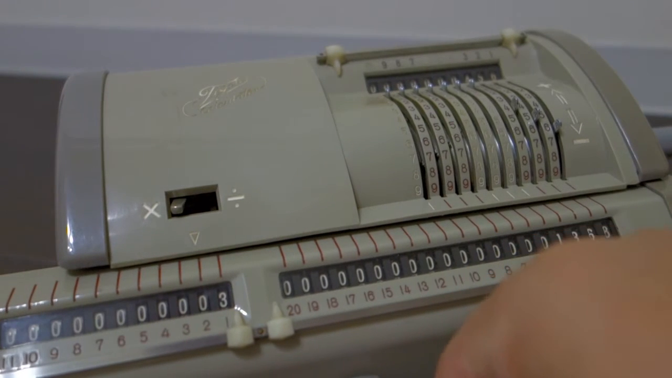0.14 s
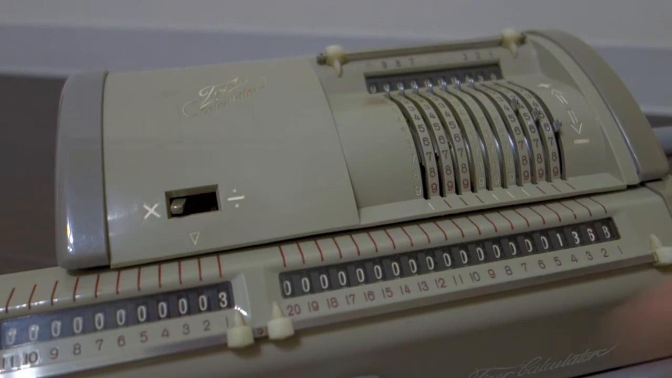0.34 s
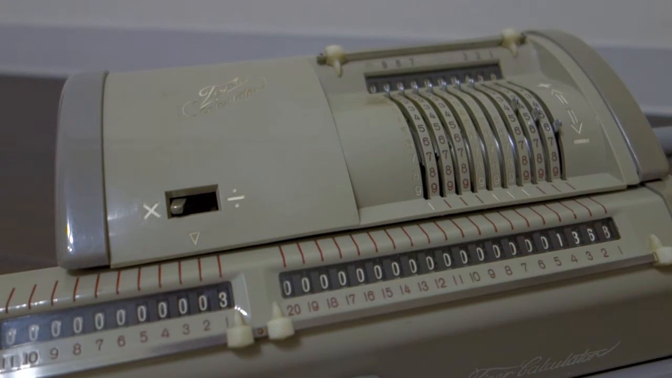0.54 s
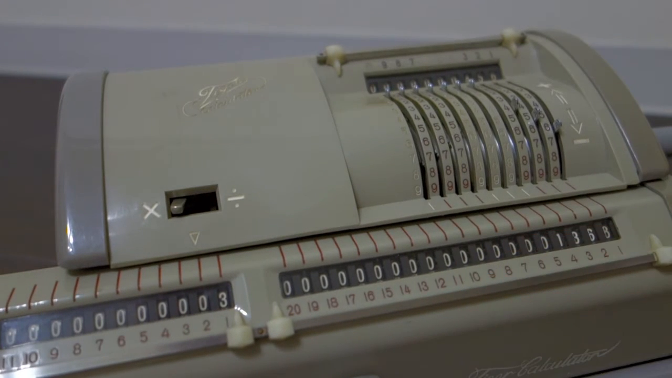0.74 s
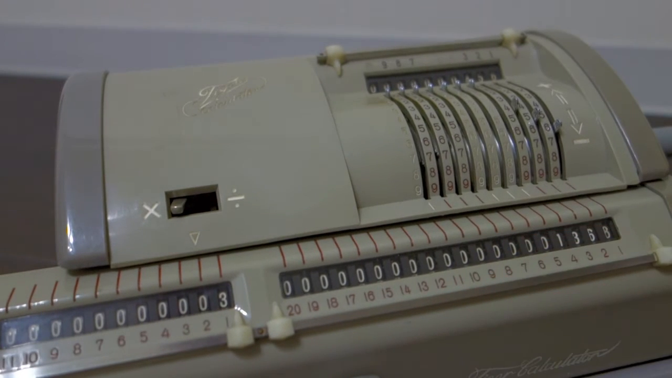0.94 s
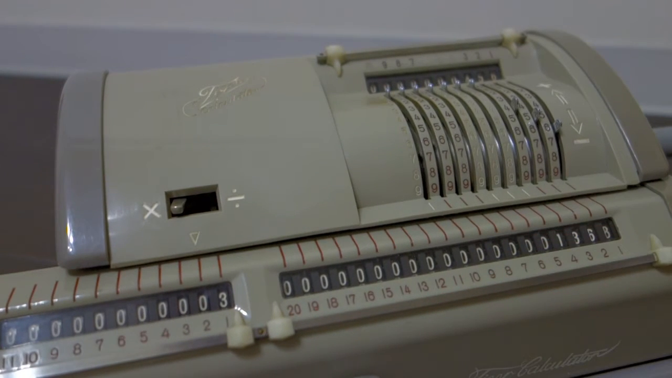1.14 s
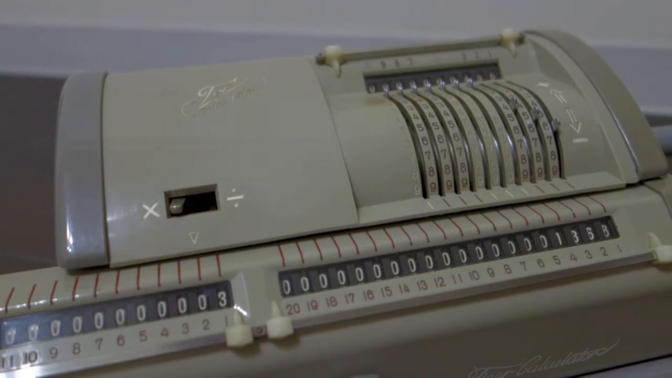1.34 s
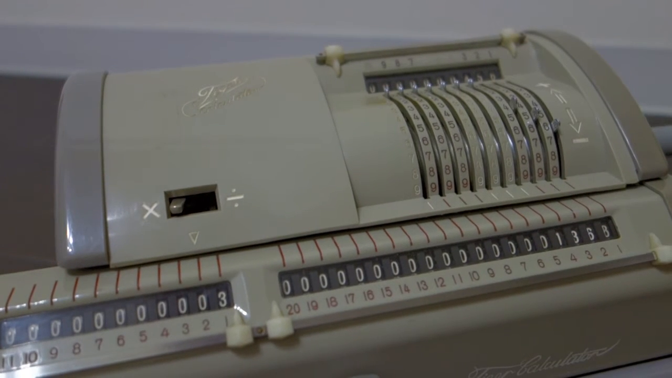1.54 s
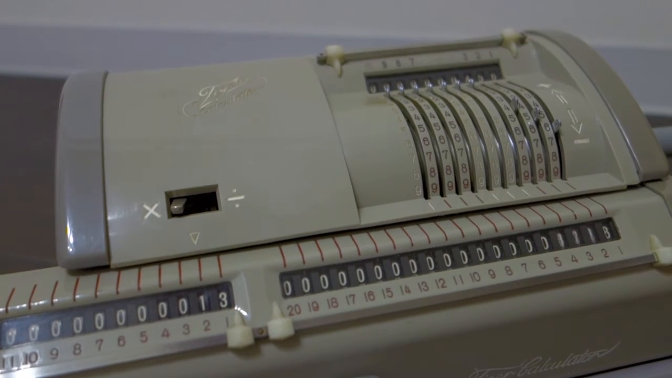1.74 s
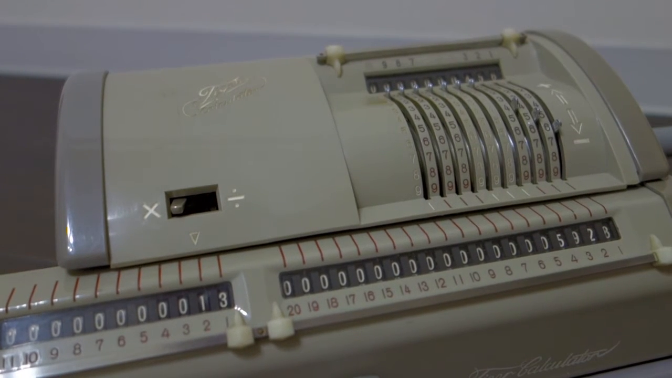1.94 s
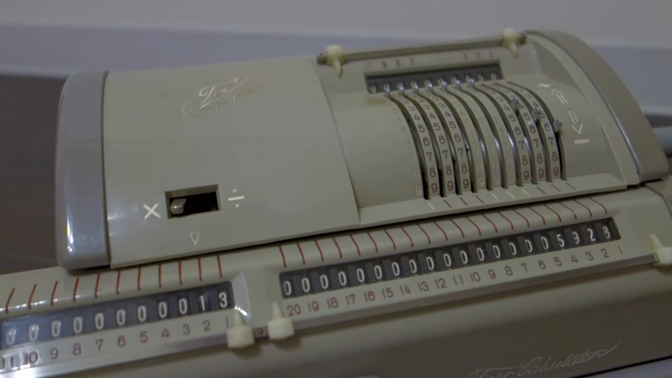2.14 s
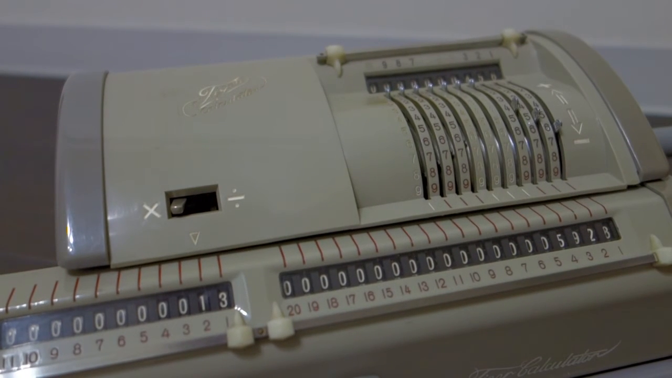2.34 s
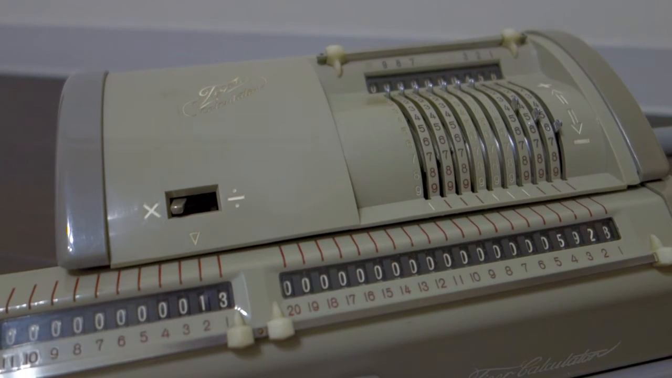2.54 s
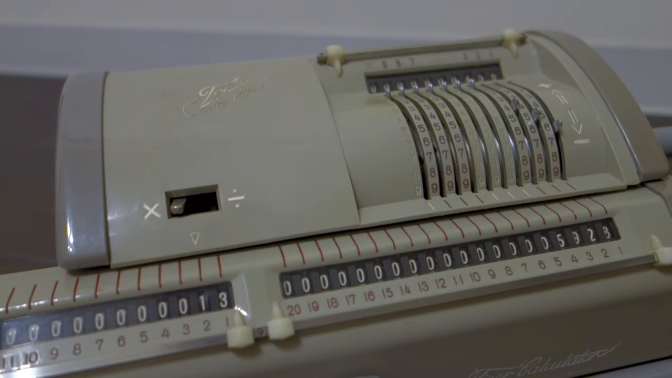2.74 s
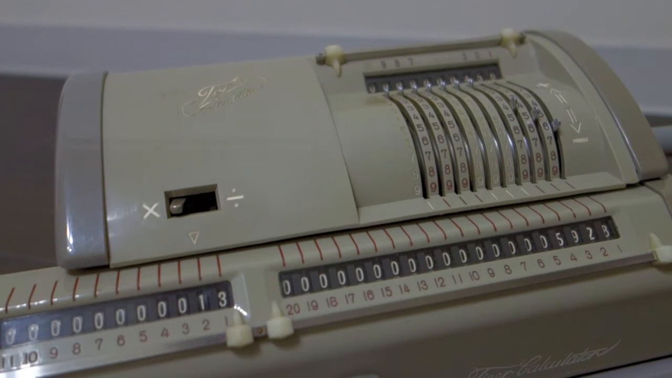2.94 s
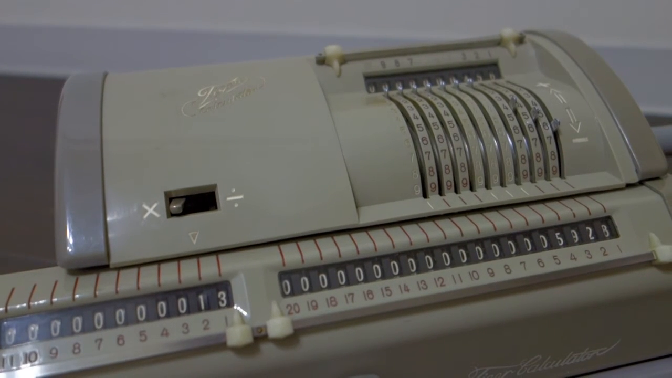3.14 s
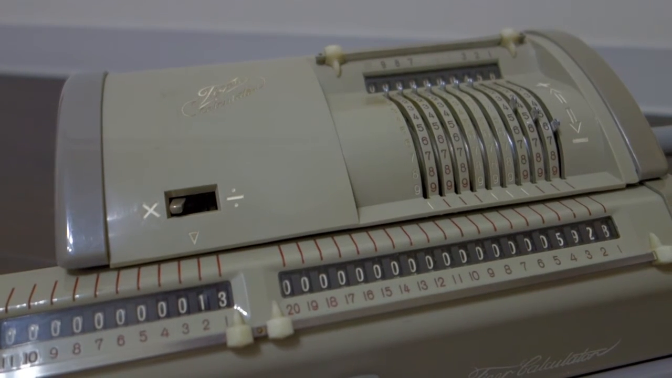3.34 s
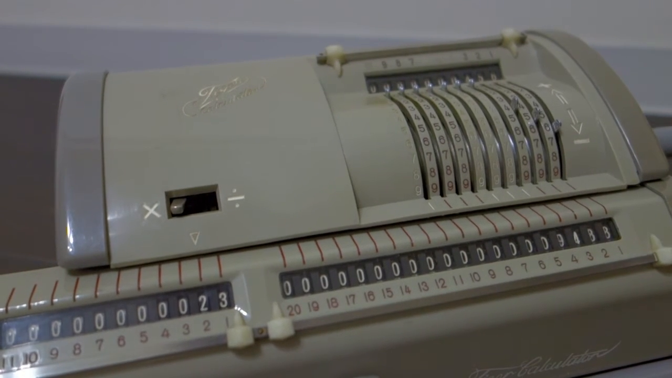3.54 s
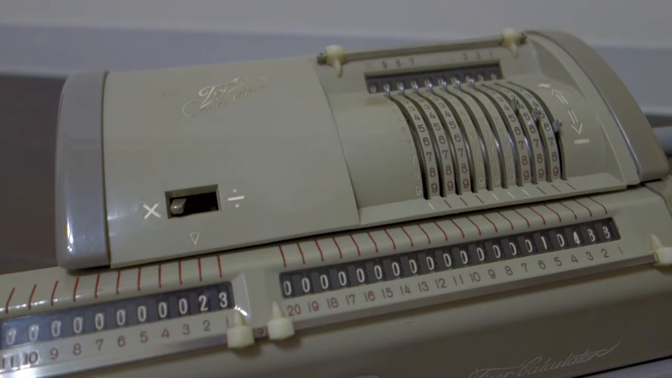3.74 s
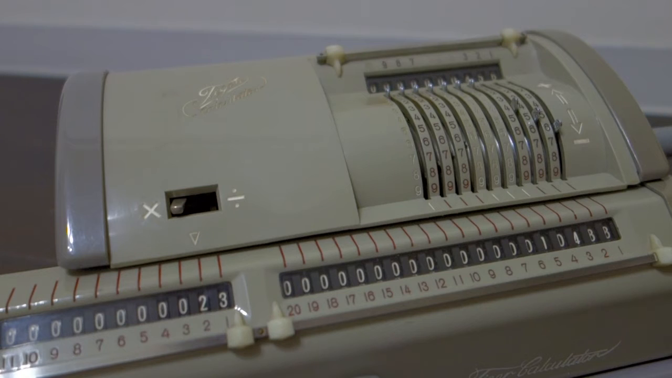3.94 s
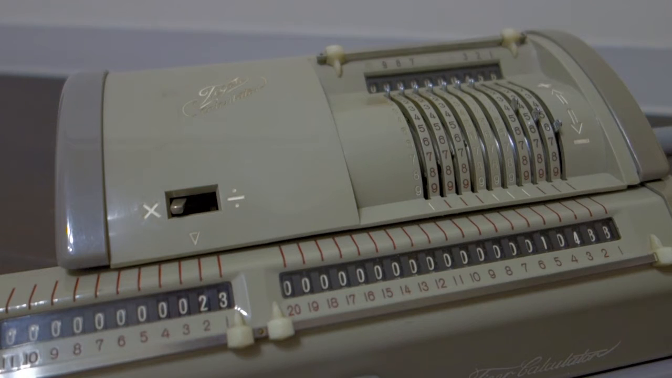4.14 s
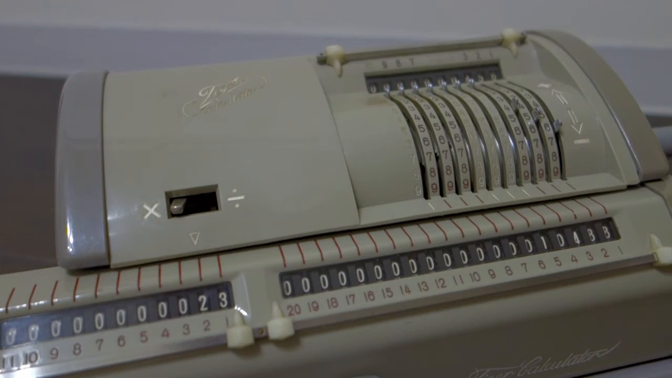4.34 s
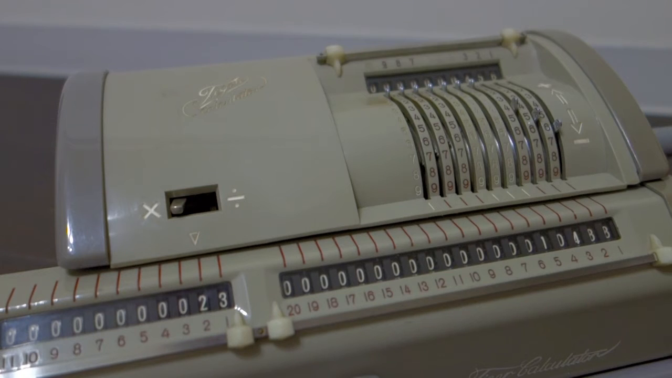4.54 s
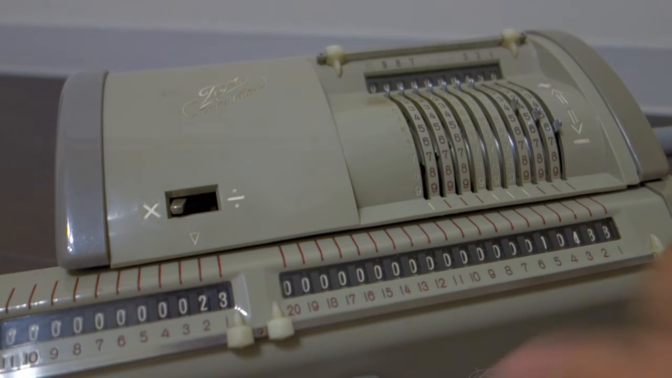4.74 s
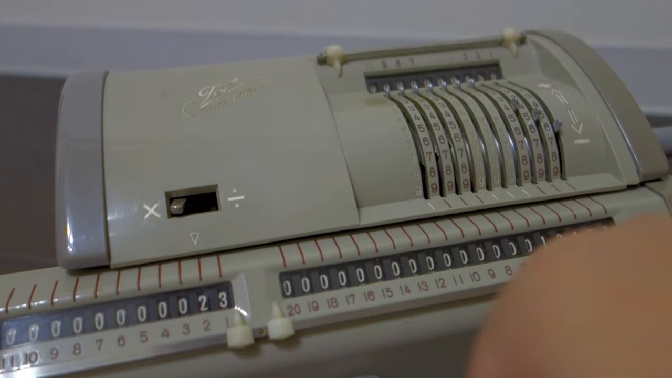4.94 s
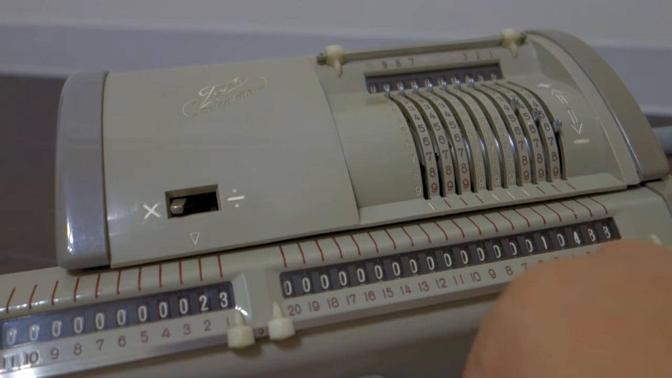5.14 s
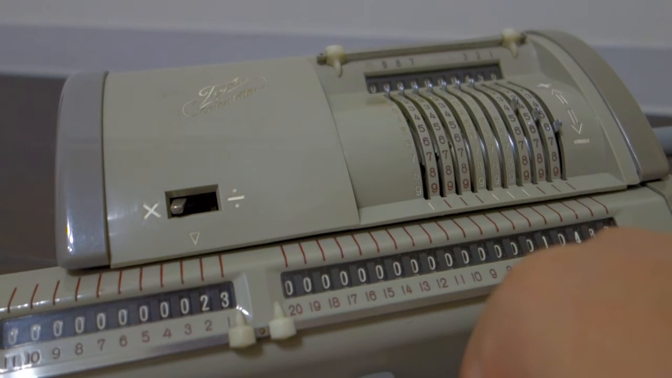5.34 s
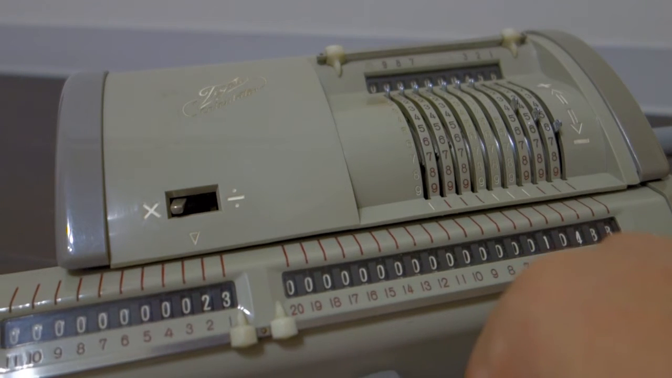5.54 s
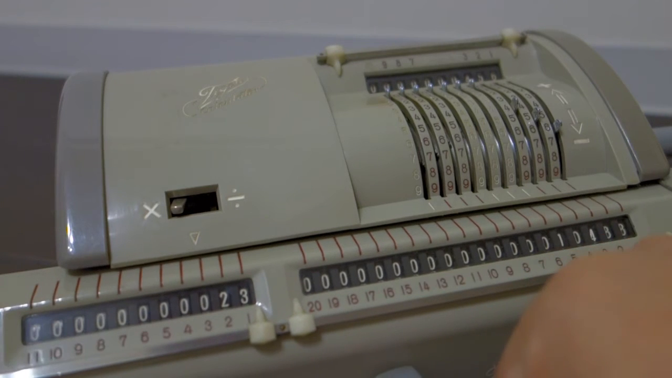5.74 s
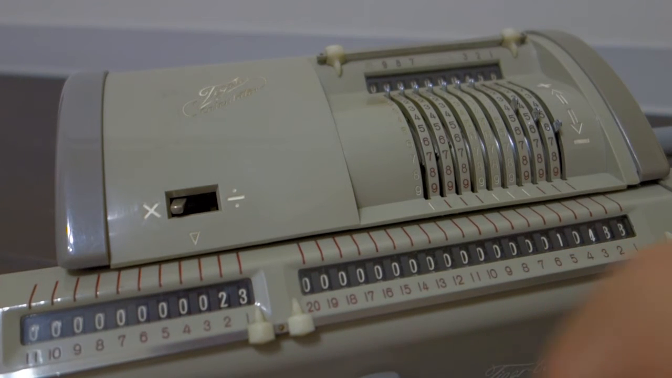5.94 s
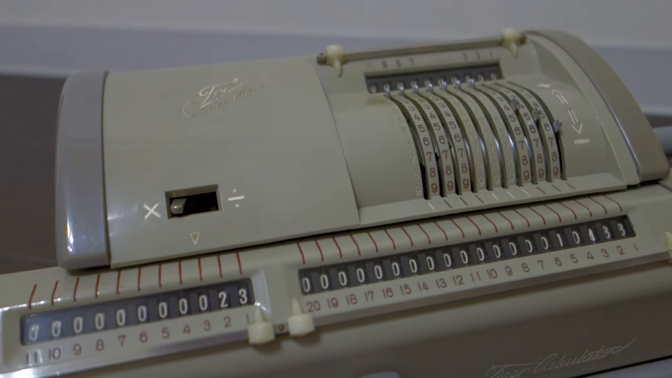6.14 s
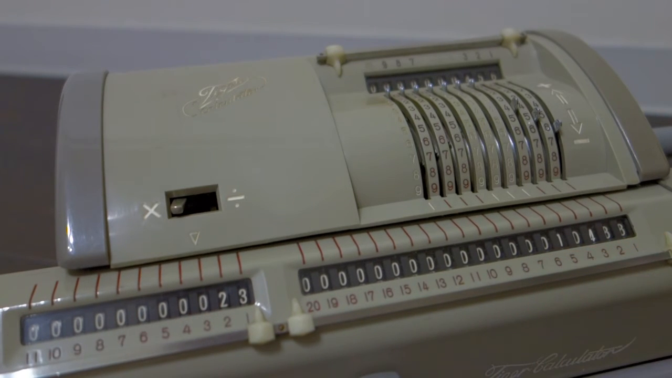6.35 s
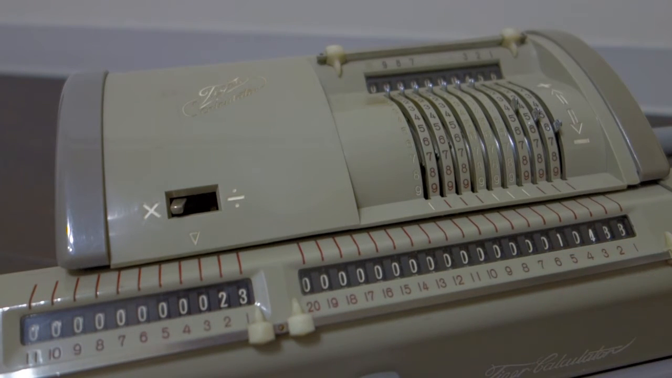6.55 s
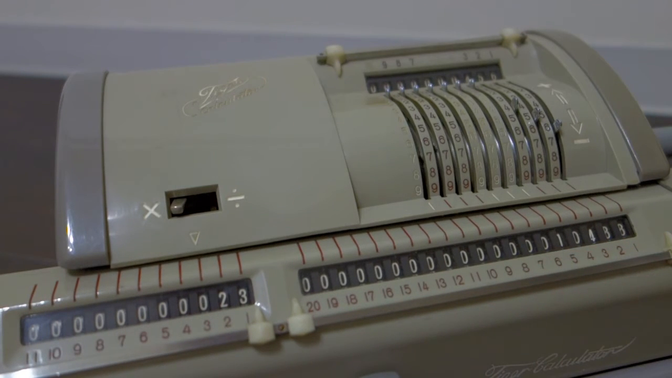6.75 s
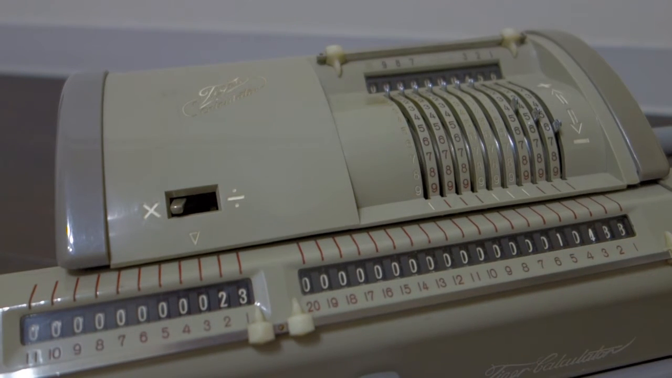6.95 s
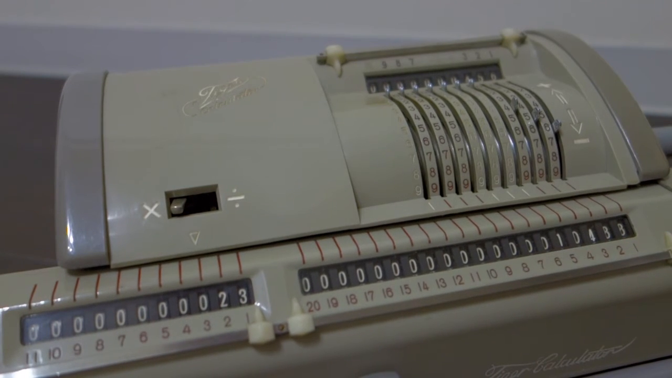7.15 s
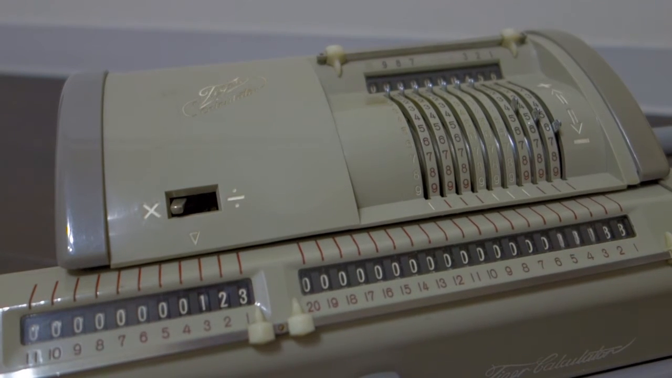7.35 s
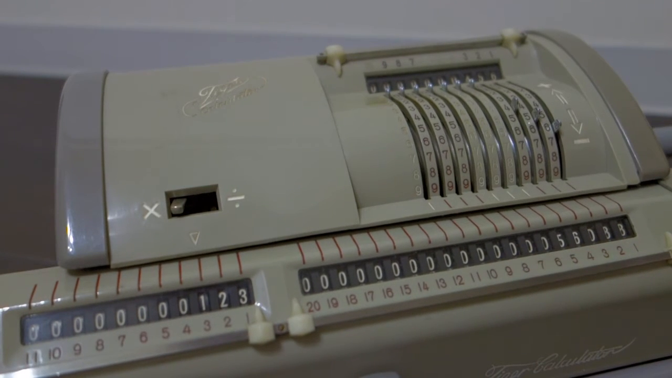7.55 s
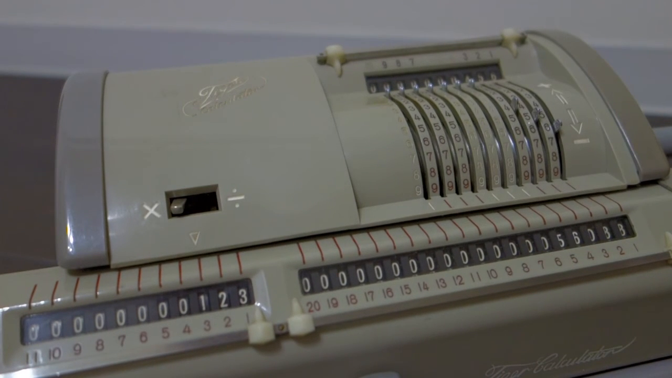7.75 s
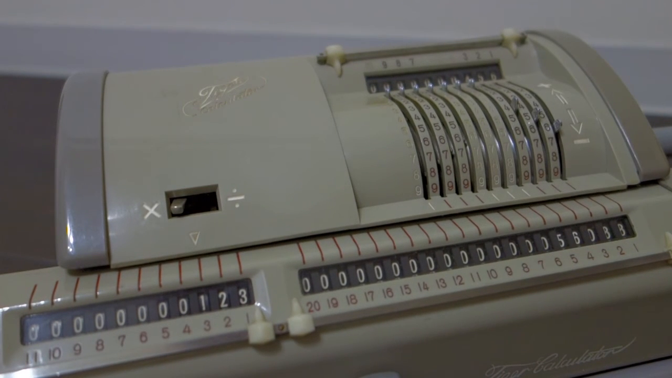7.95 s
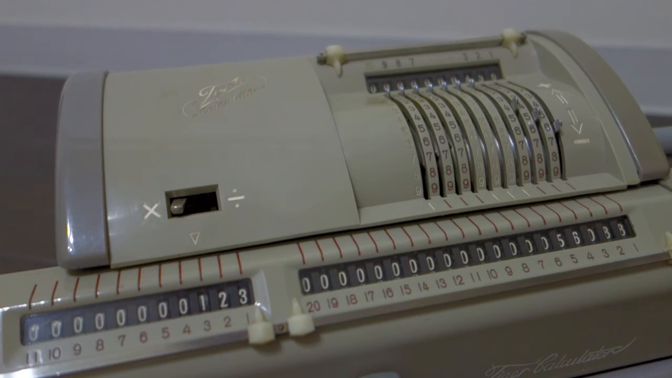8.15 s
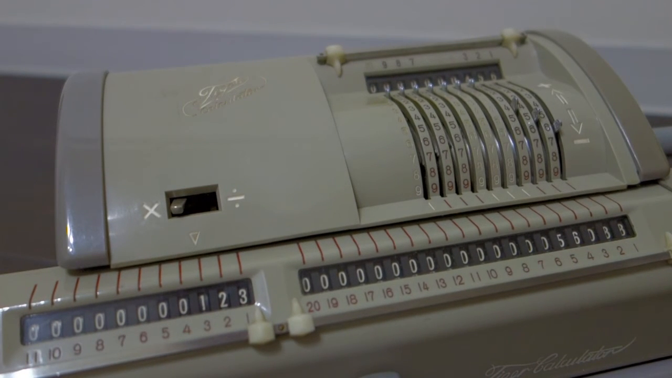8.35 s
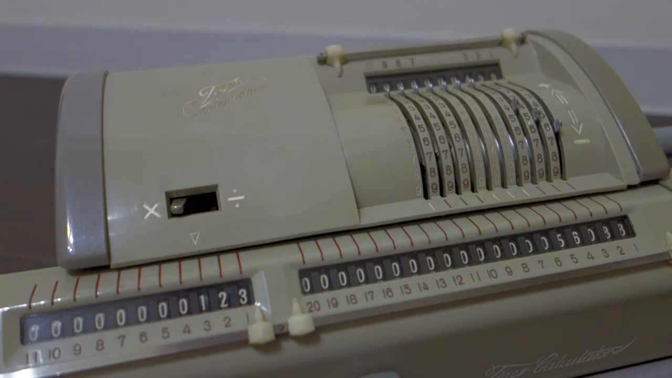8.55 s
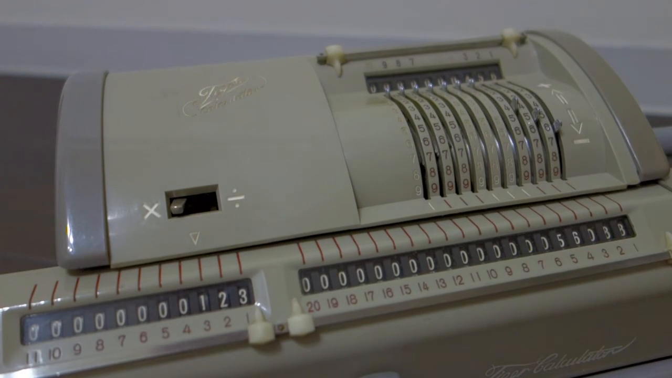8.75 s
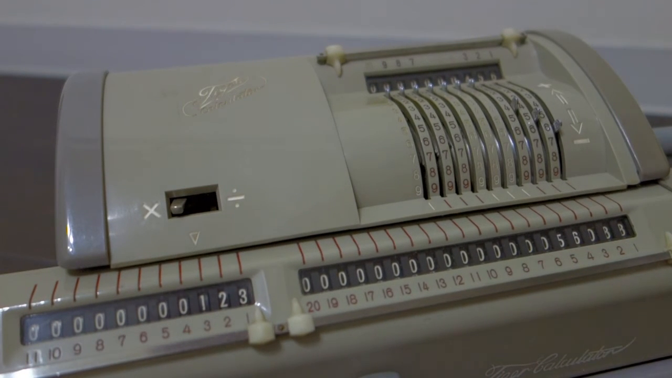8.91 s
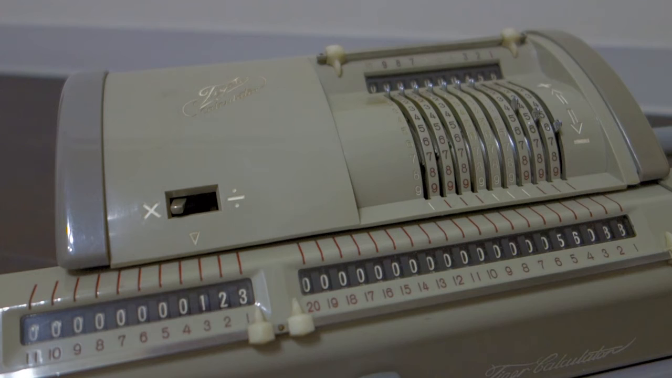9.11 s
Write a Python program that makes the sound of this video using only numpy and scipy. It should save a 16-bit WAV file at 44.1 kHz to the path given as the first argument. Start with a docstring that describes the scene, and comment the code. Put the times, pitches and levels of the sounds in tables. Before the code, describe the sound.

Sharp steel clicks, then three rattling half-second crank turns of an old adding machine, each ending in a locking clunk, in a quiet, faintly humming room.

```python
"""Hand-cranked mechanical calculator

In stereo, on a table in a small room, the works a little to the right: three turns of the crank.
Latches and pawls click, drum teeth clatter through the counter wheels, the crank locks home, the carriage steps.
Contacts ring the case's modes and shake noise bands of the steel works; rail, pin, pawl and table add their own.
Decaying noise makes the room's reflections; shaped noise and narrow resonances make its air and faint hum."""
import sys
import numpy as np
from scipy import signal
from scipy.io import wavfile

SR = 44100
rng = np.random.default_rng(int(sys.argv[2]) if len(sys.argv) > 2 else 0)


def to_wav(s):
    """Save 16-bit WAV."""
    ch = np.atleast_2d(s).T  # columns
    pcm = np.round(np.clip(ch, -1, 1) * 32767)  # PCM
    wavfile.write(sys.argv[1], SR, pcm.astype(np.int16))


N = 409248  # length [samples]

# Levels are relative. Four registers, low to high: case, frame, levers, tooth edges; tilt steps between them.
# turns of the crank: (slack taken up [s], ratchet starts [s], wind-up starts [s], first tooth [s],
#   last tooth [s], at rest [s], slowing of the drum [0-1], force on the handle before the drum bites [dB])
TURNS = [(1.186, 1.395, 1.394, 1.686, 1.889, 2.24, .04, 1.5),
         (2.899, 3.024, 3.09, 3.436, 3.699, 3.99, .23, -5),
         (6.904, 7.019, 7.103, 7.315, 7.532, 7.92, .23, 1)]
# locks and stops hit at speed: (time [s], level [dB], tilt [dB per register], t60 of the chatter [s])
CLACKS = [(0.17, -31, -3, 0.026), (1.192, -51.5, -8.5, 0.14), (1.581, -28, -1, 0.035),
          (2.034, -30, -4.5, 0.031), (2.12, -42, 1, 0.04), (2.143, -25, 1.2, 0.024),
          (3.355, -26.5, -0.5, 0.037), (3.663, -24, -1.5, 0.049), (3.808, -32, -2.9, 0.064),
          (3.888, -41.5, 0, 0.056), (3.924, -27, -0.3, 0.024), (3.931, -31, 0, 0.052),
          (5.758, -29, -2.5, 0.042), (5.98, -20, 2.5, 0.019), (7.253, -23.5, -0.1, 0.039),
          (7.473, -29.5, -.3, .052), (7.532, -25.5, -3, 0.028), (7.717, -37.5, -0.5, 0.041),
          (7.815, -26.5, 0.4, 0.027)]
# latches and carriage, moved by the fingers, snap into place:
# (time [s], level [dB], tilt [dB per register], t60 of the chatter [s])
LATCHES = [(0.148, -26, 1, 0.062), (0.196, -25.5, 2.6, 0.056), (0.943, -51.5, -1.5, 0.073),
           (0.995, -35, -2.2, .08), (2.648, -50, -2, 0.022), (2.677, -36, 0, 0.028),
           (4.291, -23.5, 2.2, 0.069), (5.392, -36, -2.5, .09), (5.405, -23, -3, .028),
           (5.649, -45, -6, 0.06), (5.953, -25, 0.9, .068), (6.703, -35, -1.5, 0.057),
           (8.229, -25, 2, 0.068)]
# light touch of a latch before its snap: (lead [s], level against the snap [dB], t60 [s])
FIRST_TOUCH = (0.0071, -16.5, 0.045)
# sprung pawls flick over with a bright tick: (time [s], level [dB])
TICKS = [(1.464, -29), (1.476, -28.5), (1.663, -28.5), (2.002, -27.5), (3.169, -30), (3.18, -36),
         (3.415, -25.5), (7.103, -28), (7.295, -26.5)]
# dull blows that mostly reach the case: (time [s], level [dB], tilt [dB per register])
KNOCKS = [(1.283, -40, -14), (1.415, -42, -4.5), (1.527, -30.5, -6.5), (1.688, -25, -6), (1.709, -21, -16),
          (1.836, -14, -8), (2.044, -30, -14), (2.924, -39.5, -25), (3.268, -35, -2.5), (3.456, -16.5, -2),
          (3.947, -30.5, -18), (4.108, -44.5, -8), (4.279, -21.5, -11.5), (5.164, -36, -13),
          (5.232, -31, -13), (5.355, -43.5, -7.5), (5.594, -23, -11), (5.763, -15, -10.5), (6.94, -39, -13),
          (7.161, -35, -4), (7.335, -22, -12), (7.465, -18.5, -8), (7.858, -29.5, -11), (8.194, -32, -6.5),
          (8.248, -29.5, -13)]
# the hand fumbles at the crank handle: (start [s], stop [s], force [dB])
FUMBLES = [(0.821, .87, -8), (6.51, 6.585, 3), (6.632, 6.667, 1.5)]
# small random contacts: (level [dB], tilt [dB per register], t60 [s])
FUMBLE_TAPS = (-46.5, -4, 0.046)
SLACK_TAPS = (-48, -6, 0.059)
RATCHET_TAPS = (-51, 2, 0.042)
COAST_TAPS = (-44, -1.4, 0.054)
# share of a contact's force in each register: (case [dB], frame [dB], levers [dB], tooth edges [dB])
CLACK_COLOUR = (-0.87, 0.074, 1.06, -0.88)
LATCH_COLOUR = (-1, -1.45, 1, -0.75)
TOOTH_COLOUR = (-1.5, -2.5, -0.5, 3)
TICK_COLOUR = (-11, -12, -8, -1)
KNOCK_COLOUR = (-0.98, -2.3, -1.2, .3)
# gears in each stage of a turn: (rumble in the case [dB], rattle of the teeth [dB], attack [s], release [s])
SLACK_GEARS = (-49.5, -68, .03, 0.14)
RATCHET_GEARS = (-46, -49, 0.14, 0.15)
WIND_UP_GEARS = (-47, -54.5, .02, 0.15)
DRUM_GEARS = (-22.5, -25.6, .045, 0.17)
COAST_GEARS = (-43.5, -58, 0.1, 0.4)
# modes of the case on the table: (frequency [Hz], level [dB], t60 [s])
CASE = [(185, -24.5, 0.13), (254, -21.5, 0.079), (405, -12, 0.093), (472, -20, 0.084), (529.4, -7, 0.057),
        (581, -1.5, 0.06), (632.5, 0.5, 0.09), (667.5, -4.5, 0.1), (707.5, 2, 0.034), (809, -9.5, 0.057),
        (930, -8, 0.043), (1023, -13, 0.071)]
# resonances of frame and levers over their dense modes: (frequency [Hz], width [Hz], level [dB])
FRAME = [(1220, 86, 2.5), (1635, 120, 8.5), (1984, 200, 3), (2186, 112, 4.5)]
LEVERS = [(3235, 396, 5), (3845, 250, 6), (4390, 260, -3), (6180, 290, -5)]
# overall slope of the steel parts' ring: (frequency [Hz], level [dB])
STEEL_TILT = [(1200, -0.5), (1800, 0.35), (2300, -.8), (3500, -1.16), (5100, -1.4), (6700, 2), (9000, 0.5),
              (12000, 0.5), (15000, -1.5)]
# the steel rail shimmers after jolts of the carriage; the first row is a ring already dying away
# at the start: (time [s], level [dB], t60 [s])
RAIL_SHIMMERS = [(0.001, -50.5, 0.38), (0.148, -21.5, 0.14), (0.195, -38, 0.37), (5.758, -17, 0.017),
                 (5.768, -71, 0.37), (5.953, -18.5, 0.089), (5.980, -30, 0.25)]
# modes of the rail: (frequency [Hz], width [Hz], level [dB])
RAIL = [(1120, 38, -14.5), (1520, 46, 4), (2024, 100, 3), (5980, 220, 2.5), (6270, 150, 0.5),
        (6360, 130, -16)]
# the sprung crank pin scrapes in its seat: (time [s], level [dB], t60 [s])
SCRAPES = [(1.40, -47, 0.1), (1.474, -32, 0.14), (3.06, -60, 0.14), (3.178, -33, 0.053), (3.588, -29, 0.13),
           (3.63, -37, 0.042), (3.81, -32, 0.12), (7.075, -54, 0.12), (7.116, -31, 0.069),
           (7.68, -47, 0.11)]
# modes of the pin: (frequency [Hz], width [Hz], level [dB])
PIN = [(6250, 67, 5), (9500, 190, -2), (11660, 200, -3)]
# a pawl chirps as it slips over a tooth of the slowing drum: (time [s], level [dB], middle pitch [Hz])
CHIRPS = [(1.976, -23, 2390), (3.7536, -24.5, 2410), (3.7813, -24.5, 2130), (7.651, -26, 2820),
          (7.6809, -25, 2190)]
# heavy blows pass through the feet and thump the table: (time [s], level [dB])
THUMPS = [(0.168, -43), (0.995, -45), (2.036, -41), (3.925, -37), (3.945, -43), (4.281, -40), (4.301, -32),
          (5.233, -37.5), (5.406, -37), (5.595, -34), (5.763, -29), (5.98, -44.5), (7.408, -43),
          (8.229, -43), (8.248, -40)]
# modes of the table: (frequency [Hz], level [dB], t60 [s])
TABLE = [(135, -12.5, 0.17), (186.5, -6.5, 0.13), (237.5, -2.5, 0.17), (403, -1.5, 0.051),
         (484, 4.5, 0.048)]
# likeness of left and right in diffuse sound: (frequency [Hz], likeness [0-1])
LIKENESS = [(30, 1), (600, 0.91), (1200, 0.66), (2200, 0.66), (4000, 0.1), (7000, 0), (16000, 0)]
# reverberation against the direct sound: (frequency [Hz], level [dB])
ROOM_LEVEL = [(150, -11.5), (600, -8), (1100, -2.5), (2000, -5), (5000, -5), (10000, -6), (16000, -8)]
# decay of the reverberation: (frequency [Hz], t60 [s])
ROOM_T60 = [(150, 0.88), (600, 0.32), (2000, 0.36), (5000, 0.37), (10000, 0.28), (16000, 0.24)]
# spectrum of the room's still air: (frequency [Hz], relative density [dB per Hz])
AIR = [(15, -45), (25, -20), (134, -10.5), (190, -15.5), (212, -13), (256, -0.5), (285, -16), (373, -12),
       (503, -18.5), (734, -18.5), (863, -21.5), (2410, -32), (3520, -33.5), (5000, -36.5), (16000, -39.5)]
# hum swelling in the room's low resonances: (frequency [Hz], width of each filter pass [Hz], rms level [dB])
HUM = [(58.1, 4.6, -64), (138, 8.9, -61), (184.9, 15.4, -60), (249.7, 24, -54)]

RATCHET_S = 0.085  # run of the ratchet before the pawl flicks over
MIDDLE = 1.5  # a tilt about the middle of registers 0-3 keeps their mean level in dB


def drum_teeth(first_s, last_s, slowing):
    """The drum's teeth hit the counter wheels in turn, further apart as the load slows the hand."""
    mean_gap_s = 0.026  # nominal; rounded to a whole number of teeth
    count = int(round((last_s - first_s) / mean_gap_s)) + 1
    along = np.linspace(0, 1, count)
    times = first_s + (last_s - first_s) * (along - slowing * along * (1 - along))
    light_start_db = -3.5 * np.exp(-np.arange(count))  # the first teeth bite more lightly
    uneven_db = 0.6 * rng.standard_normal(count)
    level_db = -25 + light_start_db + uneven_db
    tilt_db = -0.6 * along  # the teeth grow duller along the run
    # chatter lasts longest in mid-run, where most wheels are spinning
    t60 = 0.048 + 0.056 * np.sin(np.pi * along) ** 2
    return blows(times, level_db, tilt_db, t60, TOOTH_COLOUR, pivot=MIDDLE)


def latches():
    """Each latch touches its stop lightly, then snaps fully into place."""
    times, level_db, tilt_db, t60s = np.transpose(LATCHES)
    lead_s, touch_db, touch_t60 = FIRST_TOUCH
    touches = blows(times - lead_s, level_db + touch_db, tilt_db, touch_t60, LATCH_COLOUR, pivot=MIDDLE)
    snaps = blows(times, level_db, tilt_db, t60s, LATCH_COLOUR, pivot=MIDDLE)
    return np.vstack([touches, snaps])


def pawl_ticks():
    """Sprung pawls tick brightly as they flick over, and again at each chirping slip."""
    slip_s, slip_db, _ = np.transpose(CHIRPS)
    flicks = blows(*np.transpose(TICKS), tilt_db=0, t60=0.056, colour_db=TICK_COLOUR)
    slips = blows(slip_s, slip_db - 4, tilt_db=0, t60=0.028, colour_db=TICK_COLOUR)
    return np.vstack([flicks, slips])


def taps(start_s, stop_s, kind, count, force_db=0):
    """Loose parts touch as a movement starts, then at uneven intervals while it lasts."""
    db, tilt_db, t60 = kind
    gaps, luck = rng.uniform(.5, 2, count), rng.standard_normal(count)
    along = (np.cumsum(gaps) - gaps) / gaps.sum()
    times = start_s + (stop_s - start_s) * along
    level_db = db + force_db + 2.2 * np.clip(luck, -2, 2)
    return blows(times, level_db, tilt_db, t60)


def blows(times, level_db, tilt_db, t60, colour_db=0, pivot=0):
    """Contact rows (time [s], four register levels [dB], t60 [s]); positive tilt favours the high registers."""
    times, level_db, tilt_db, t60 = np.broadcast_arrays(times, level_db, tilt_db, t60)
    register_db = level_db[:, None] + np.outer(tilt_db, np.arange(4) - pivot) + colour_db
    return np.column_stack([times, register_db, t60])


def all_contacts():
    """Every shared blow on the works and case: latches, clacks, ticks, knocks, drum teeth and taps."""
    rows = [latches(), blows(*np.transpose(CLACKS), CLACK_COLOUR, pivot=MIDDLE), pawl_ticks(),
            blows(*np.transpose(KNOCKS), t60=0.048, colour_db=KNOCK_COLOUR)]
    for slack, ratchet, wind_up, first, last, rest, slowing, force_db in TURNS:
        rows += [taps(slack, ratchet, SLACK_TAPS, count=3, force_db=force_db),
                 taps(ratchet, ratchet + RATCHET_S, RATCHET_TAPS, count=3),
                 taps(wind_up, first, RATCHET_TAPS, count=4, force_db=force_db),
                 drum_teeth(first, last, slowing),
                 taps(last, rest, COAST_TAPS, count=5)]
    for start, stop, force_db in FUMBLES:
        rows.append(taps(start, stop, FUMBLE_TAPS, count=2, force_db=force_db))
    return np.vstack(rows)


def running_gears():
    """Rumble and rattle (dB) follow each turn: slack, ratchet, wind-up, the drum's run, coasting to rest."""
    run_out_s = 0.04  # the wheels spin on after the last tooth
    gains = 1e-9  # keeps the logarithm finite
    for slack, ratchet, wind_up, first, last, rest, _, force_db in TURNS:
        gains = (gains + stage(slack, ratchet, SLACK_GEARS, force_db)
                 + stage(ratchet, ratchet + RATCHET_S, RATCHET_GEARS)
                 + stage(wind_up, first, WIND_UP_GEARS, force_db)
                 + stage(first, last + run_out_s, DRUM_GEARS, sag_db_per_s=31.5)
                 + stage(last, rest, COAST_GEARS))
    return 20 * np.log10(gains)


def stage(start_s, stop_s, gears, force_db=0, sag_db_per_s=0):
    """Gains of rumble and rattle swell and fade over one stage; the rumble may sag from its start."""
    rumble_db, rattle_db, attack_s, release_s = gears
    t = np.arange(N) / SR
    shape = np.minimum((t - start_s) / attack_s, (stop_s - t) / release_s)
    swell = np.clip(shape, 0, 1) * from_db(force_db)
    sag_db = sag_db_per_s * np.clip(t - start_s, 0, 1)
    return np.stack([swell * from_db(rumble_db - sag_db), swell * from_db(rattle_db)])


def works(contacts, rattle_db):
    """Frame, levers and tooth edges ring with each contact and with the running gears."""
    frame_db, levers_db, edge_db = contacts.T[2:-1]
    frame = register(contacts, frame_db, rattle_db - 7.0, 767, 2795, likeness=0.97, crack=0.28, colour_db=1.0)
    levers = register(contacts, levers_db, rattle_db - 7.0, 2760, 6690, likeness=0.61, crack=0.98, colour_db=2.0)
    edges = register(contacts, edge_db, rattle_db - 6.5, 6560, 15700, likeness=0.17, crack=2.5, colour_db=2.0)
    low = from_db(-3.0) * place(frame + resonate(frame, FRAME), pan_db=-0.5)
    middle = from_db(-2.0) * place(levers + resonate(levers, LEVERS), pan_db=-3.0)
    left, right = from_db(1.07) * place(edges, pan_db=-4.5)
    # the works lie to the right, so their treble reaches the left side one sample later
    high = np.stack([np.roll(left, 1), right])
    return low + middle + high


def register(contacts, level_db, rattle_db, low_hz, high_hz, likeness, crack, colour_db, count=3):
    """Noise stands for countless close modes; contacts and teeth favour different parts of the register."""
    times, t60s = contacts.T[[0, -1]]
    edges, out = np.linspace(low_hz, high_hz, count + 1), 0
    teeth = gear_teeth(per_s=250, spread_db=0.5) ** 2
    fade = np.exp(-1 / (0.0077 * SR))  # each tooth's power dies with a 7.7 ms time constant
    for low, high in zip(edges, edges[1:]):
        luck_db = colour_db * rng.standard_normal(len(times))
        power = chatter(times, level_db + luck_db, t60s, crack)
        tooth_power = teeth * rng.exponential(1, N) + 1e-18
        power += from_db(rattle_db) ** 2 * signal.lfilter([1 - fade], [1, -fade], tooth_power)
        tilt = from_db(at_hz(STEEL_TILT, (low + high) / 2))
        out = out + tilt * band(stereo_noise(likeness, N) * np.sqrt(power), low, high)
    return out * np.sqrt(SR / 2 / (high_hz - low_hz))  # makes up for the power outside the band


def chatter(times, level_db, t60s, crack):
    """Power of vibrating steel: a contact closes over about a millisecond, cracks, then chatters and dies."""
    power = np.zeros(N + SR)
    t = np.arange(SR // 2) / SR
    closing = 1 - np.exp(-t / 0.0008)
    sharp = 1 + crack * np.exp(-t / 0.00088)
    for s, db, t60 in zip(times, level_db, t60s):
        at, size = int(abs(s) * SR), min(int(t60 * SR), len(t))
        decay = np.exp(-np.log(10 ** 6) * t[:size] / t60)
        power[at:at + size] += from_db(db) ** 2 * decay * closing[:size] * sharp[:size]
    return power[:N]


def case(contacts, rumble_db):
    """The hollow case knocks at every contact and rumbles while the gears run; it radiates little bass."""
    times, case_db = contacts.T[:2]
    knocks = strike(times, case_db, CASE, spread_db=1.5)
    teeth = gear_teeth(per_s=700, spread_db=2.0) * rng.choice([-1, 1], N)
    rumble = np.zeros(N)
    for k, (hz, db, t60) in enumerate(CASE):
        rumble += from_db(db) * ring(teeth, hz, t60) * (-1) ** (k // 2)
    return band(knocks + from_db(rumble_db) * rms_one(rumble), 143, 2100)


def gear_teeth(per_s, spread_db):
    """Meshing teeth give small uneven knocks at random moments; rms one."""
    hits = rng.random(N) < per_s / SR
    return rms_one(hits * from_db(spread_db * np.clip(rng.standard_normal(N), -2, 2)))


def strike(times, level_db, modes, spread_db):
    """Blows on a body; each lands elsewhere and so gives every mode a strength of its own."""
    out, luck = np.zeros(N), rng.standard_normal((len(times), len(modes)))
    for k, (hz, mode_db, t60) in enumerate(modes):
        push = np.zeros(N)
        push[np.abs(times * SR).astype(int)] = from_db(level_db + mode_db + spread_db * luck[:, k])
        out += ring(push, hz, t60) * (-1) ** (k // 2)  # polarity alternates by pairs of modes
    return out


def ring(push, hz, t60):
    """A unit click sets a decaying sine of height one ringing."""
    r, w = from_db(-60 / (t60 * SR)), 2 * np.pi * hz / SR
    return signal.lfilter([0, np.sin(w)], [1, -2 * r * np.cos(w), r * r], push + 1e-18)


def shimmer(events, modes, likeness):
    """A small steel part, shaken by decaying noise at each event, sings in its few modes."""
    shaking = stereo_noise(likeness, N) * np.sqrt(chatter(*np.transpose(events), crack=0))
    gain = np.sqrt(np.sum(resonate(signal.unit_impulse(SR // 4), modes) ** 2))
    return resonate(shaking, modes) / gain


def pawl_chirps(length_s, fall):
    """Each slip of the pawl is a brief squeak that sags in pitch."""
    out, t = np.zeros(N), np.arange(int(length_s * SR)) / SR
    swell = np.sin(np.pi * t / length_s) ** 2
    for s, db, hz in CHIRPS:
        pitch = hz * (1 + fall * (.5 - t / length_s))
        at = int(s * SR)
        out[at:at + len(t)] += from_db(db) * swell * np.sin(2 * np.pi * np.cumsum(pitch) / SR)
    return out


def table_thumps():
    """Heavy blows through the feet set the table's modes ringing."""
    return band(strike(*np.transpose(THUMPS), TABLE, spread_db=4.5), 128, 1200)


def room(x, build_s):
    """Reflections thicken over a few milliseconds, then die at a rate that depends on frequency."""
    t, response = np.arange(int(.7 * SR)) / SR, 0
    for hz, noise in noise_bands(len(t)):
        decay = np.exp(-np.log(1000) * t / at_hz(ROOM_T60, hz))
        tail = decay * (1 - np.exp(-(t / build_s) ** 2))
        level = from_db(at_hz(ROOM_LEVEL, hz))
        response = response + noise * tail / np.sqrt(np.sum(tail ** 2)) * level
    return signal.fftconvolve(x, response, axes=1)[:, :N]


def background():
    """Faint room air is shaped noise; the wavering hum is noise in narrow low resonances."""
    air = rms_one(sum(from_db(at_hz(AIR, hz)) * noise for hz, noise in noise_bands(N)))
    hum = np.zeros(N)
    for hz, width, db in HUM:
        tone = resonance(resonance(rng.standard_normal(N), hz, width), hz, width)
        hum += from_db(db) * rms_one(tone)
    return from_db(-52) * air + hum


def noise_bands(size):
    """Diffuse sound in half-octave bands: (centre [Hz], stereo noise)."""
    edges = np.geomspace(22, 18000, 20)
    for low, high in zip(edges, edges[1:]):
        hz = np.sqrt(low * high)
        yield hz, band(stereo_noise(at_hz(LIKENESS, hz), size), low, high)


def stereo_noise(likeness, size):
    """White noise in two channels that are alike to the given degree."""
    mid, side = rng.standard_normal((2, size))
    alike = np.clip(likeness, -1, 1)
    return np.sqrt((1 + alike) / 2) * mid + np.sqrt((1 - alike) / 2) * side * [[1], [-1]]


def place(x, pan_db):
    """Make the left side louder than the right by pan_db."""
    return x * from_db(np.array([[pan_db], [-pan_db]]) / 2)


def resonate(x, modes):
    """A bank of resonances side by side."""
    return sum(from_db(db) * resonance(x, hz, width) for hz, width, db in modes)


def resonance(x, hz, width):
    """A resonance with a gain of about one on top."""
    r = np.exp(-np.pi * width / SR)
    feedback = [1, -2 * r * np.cos(2 * np.pi * hz / SR), r * r]
    return signal.lfilter(np.array([1, 0, -1]) * (1 - r * r) / 2, feedback, x)


def band(x, low_hz, high_hz, order=2):
    """Butterworth band-pass."""
    edges = [low_hz, min(high_hz, .45 * SR)]
    return signal.sosfilt(signal.butter(order, edges, "band", fs=SR, output="sos"), x)


def at_hz(points, hz):
    """Read a spectrum on a log-frequency axis."""
    points_hz, values = np.transpose(points)
    return np.interp(np.log(hz), np.log(points_hz), values)


def rms_one(x):
    """Scale to an rms of one."""
    return x / np.sqrt(np.mean(x ** 2) + 1e-20)


def from_db(db):
    """Decibels to gain."""
    return 10 ** (np.asarray(db) / 20)


def scene():
    """The calculator on its table, its reflections in the room, and the room's own faint sound."""
    contacts = all_contacts()
    rumble_db, rattle_db = running_gears()
    rail = place(shimmer(RAIL_SHIMMERS, RAIL, likeness=0.75), pan_db=-1.0)
    pin = place(shimmer(SCRAPES, PIN, likeness=1.0), pan_db=-3.0)
    pawl = from_db(-1.5) * pawl_chirps(length_s=0.0083, fall=0.25)
    machine = works(contacts, rattle_db) + case(contacts, rumble_db) + rail + pin + pawl + table_thumps()
    return machine + room(machine, build_s=0.0045) + background()


def record(dry):
    """A steep elliptic low-pass removes everything above 15.8 kHz."""
    return signal.sosfilt(signal.ellip(10, .1, 80, 15800, fs=SR, output="sos"), dry)


dry = scene()
out = record(dry)
to_wav(out)
```